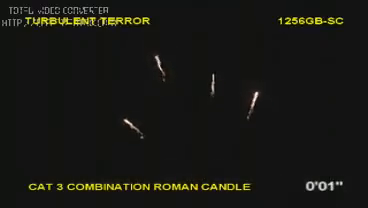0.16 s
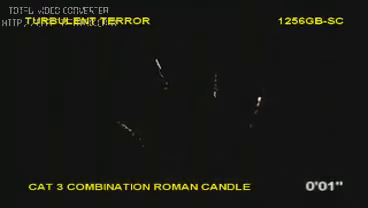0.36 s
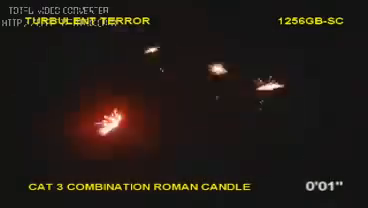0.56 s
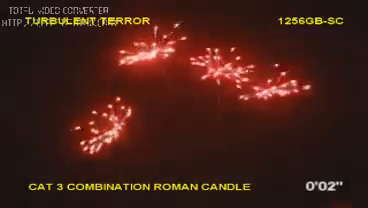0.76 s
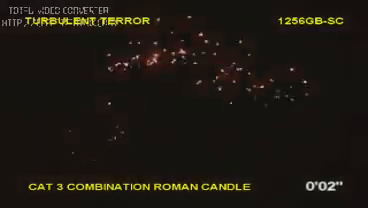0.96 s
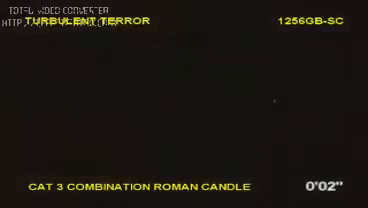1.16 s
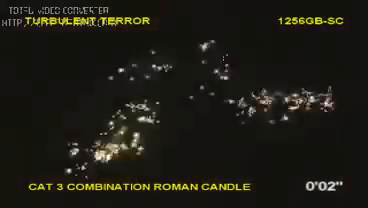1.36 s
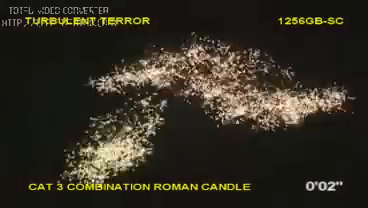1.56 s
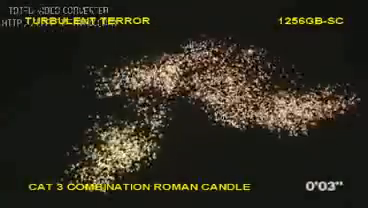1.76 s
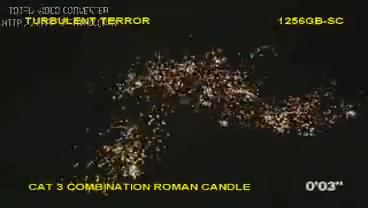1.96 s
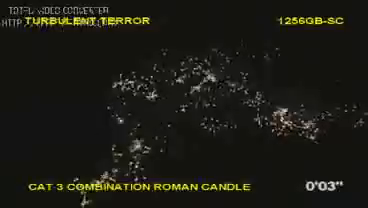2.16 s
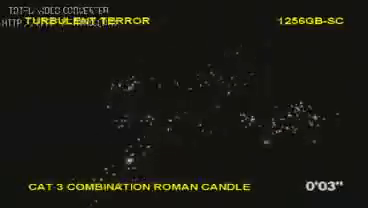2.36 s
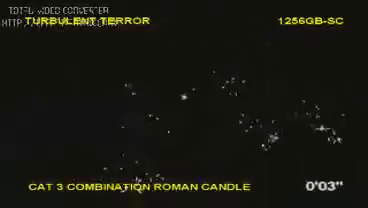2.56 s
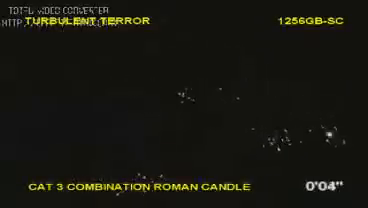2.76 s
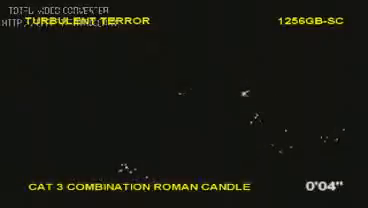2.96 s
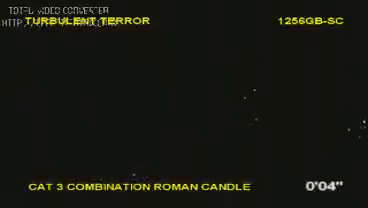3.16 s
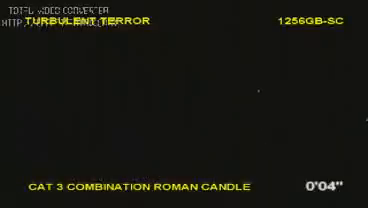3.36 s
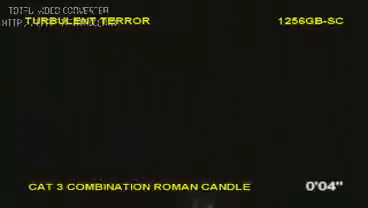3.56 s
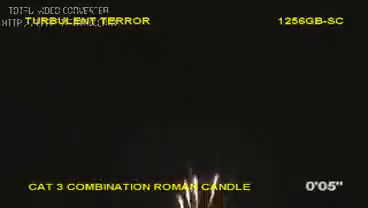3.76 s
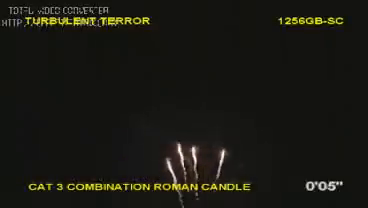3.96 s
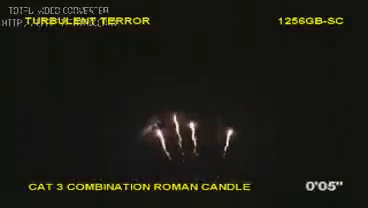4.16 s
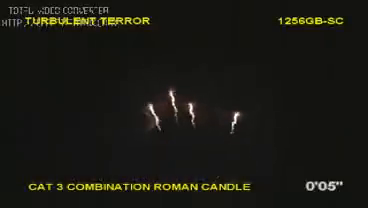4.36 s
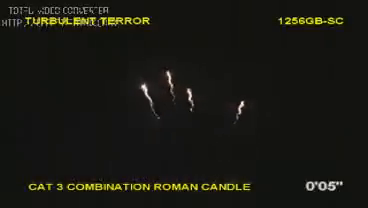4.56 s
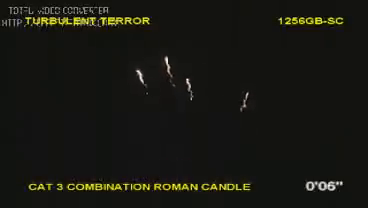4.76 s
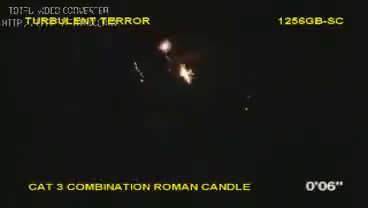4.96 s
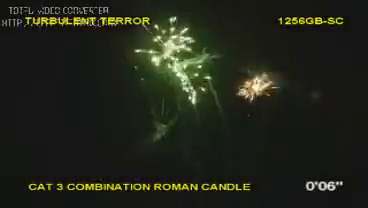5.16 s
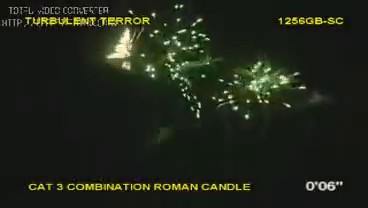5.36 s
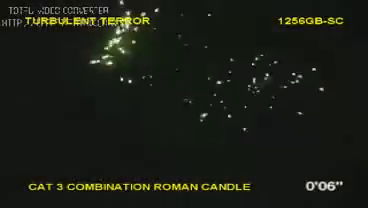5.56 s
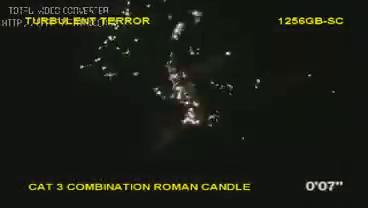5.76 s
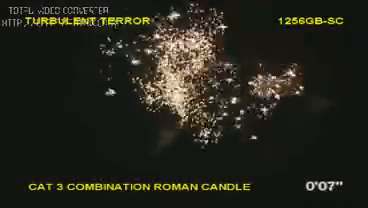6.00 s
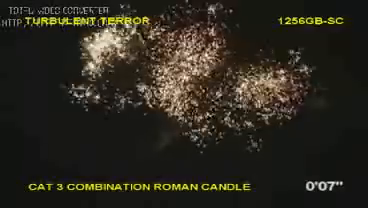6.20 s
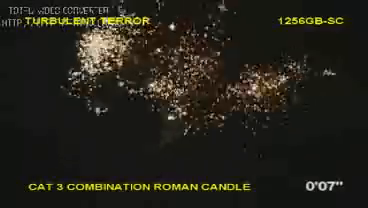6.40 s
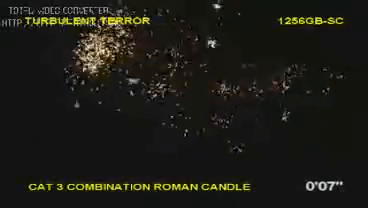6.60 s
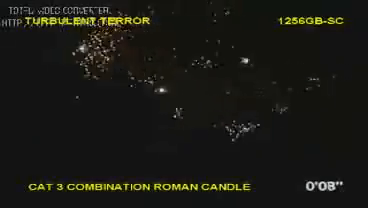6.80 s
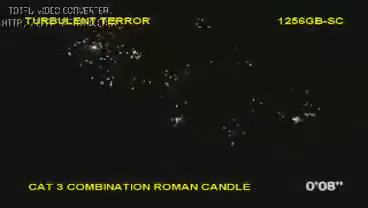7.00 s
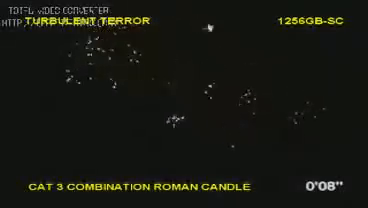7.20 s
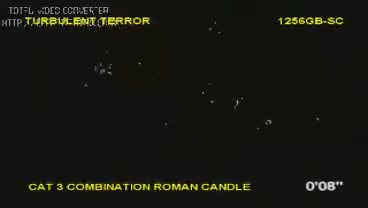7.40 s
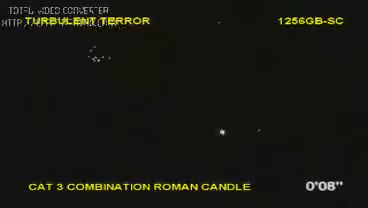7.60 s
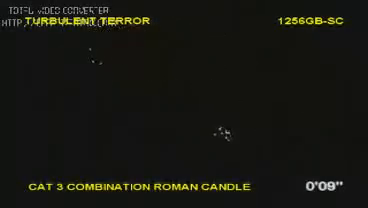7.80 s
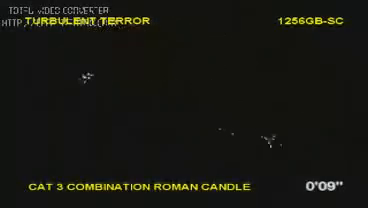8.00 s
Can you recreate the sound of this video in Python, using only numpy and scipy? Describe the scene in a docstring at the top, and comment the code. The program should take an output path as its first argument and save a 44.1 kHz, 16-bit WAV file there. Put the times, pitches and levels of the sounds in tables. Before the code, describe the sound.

A firework cake bursts in rapid echoing bangs, crackles away, then thumps out another volley that bursts and crackles in turn.

```python
"""Outdoors among houses, at night: a firework cake fires volleys of four lift charges.
The charges thump, the shells climb with sputtering tails and burst, and their stars crackle away.
Each cloud of stars swells, thins and dies out, leaving a few big ones that pop singly.
Two microphones, 30 m apart: left near and in the open, right far, among walls and set louder.
Reports reach the right about 90 ms later, overload it if strong, and roll round the neighbourhood."""
import sys
import numpy as np
from scipy import signal
from scipy.fft import rfft, irfft, next_fast_len
from scipy.io import wavfile

SR = 44100
rng = np.random.default_rng(int(sys.argv[2]) if len(sys.argv) > 2 else 0)


def bounce(signal):
    """Save signal as a 16-bit WAV file at the path given by the first command-line argument."""
    frames = np.transpose(np.atleast_2d(signal))
    limited = np.clip(frames, -1, 1)
    pcm = np.round(limited * 32767).astype(np.int16)
    wavfile.write(sys.argv[1], SR, pcm)


N = 354563
LEAD = SR  # samples before time zero
TOP_HZ = 7800
LIFT_LAG_S = .098  # near to far microphone

# lift charges: (near time [s], thump [dB], gas blast [dB])
LIFTS = [(-.9, -3, -3), (-.85, -3, -2), (-.79, -2.5, -1), (-.73, -2.5, 0), (3.6742, -.5, -2),
         (3.7220, 0, -3), (3.7762, 1, .5), (3.8332, 1, 2.5)]
# shell bursts: (near time [s], near level [dB], far time [s], far level [dB],
# wall delay [s], house delay [s], house echo [dB])
BURSTS = [(.7776, 2, .8669, 11, .004, .158, -15), (.8269, 2, .9141, 10, .003, .198, -19),
          (.8610, 0, .9467, 8, .0036, .238, -14.5), (.8772, 0, .9595, 8, .0038, .235, -16),
          (5.2447, 3.5, 5.3298, 12, .0035, .11, -15), (5.2560, 3.5, 5.3362, 11, .0043, .143, -16),
          (5.4190, 2, 5.5054, 11, .0032, .224, -13), (5.5336, -2, 5.6129, 13, .0039, .149, -8)]
# star clouds: (ignition at far microphone [s], peak activity [dB], burn [s])
CLOUDS = [(1.585, 1.5, .73), (6.07, 3, .65)]
# late single stars: (ignition at far microphone [s], relative level [dB])
LATE_STARS = [(2.64, -19), (2.689, -19), (2.722, -18), (2.779, -19), (2.816, -21), (2.857, -17),
              (2.884, -23), (2.949, -22), (2.973, -18), (2.988, -25), (3.024, -20), (3.187, -18),
              (3.196, -20), (3.278, -22), (3.408, -22), (6.969, -16), (7.078, -20), (7.129, -18),
              (7.148, -18), (7.178, -18), (7.203, -18), (7.21, -18), (7.216, -19), (7.244, -19),
              (7.284, -20), (7.313, -22), (7.396, -20), (7.445, -17), (7.495, -20), (7.544, -20),
              (7.669, -20), (7.701, -21), (7.892, -17)]

# background spectrum: (frequency [Hz], level [dB])
RUMBLE_TONE = [(25, -21), (70, 2), (100, 1.5), (140, -10), (185, 0), (230, -2), (300, -16), (450, -22),
               (1600, -25), (3900, -44), (7500, -44)]
# burning tail spectrum: (frequency [Hz], level [dB])
FIZZ_TONE = [(100, -20), (500, -6), (1000, -2), (1700, 1), (3100, -4), (4300, -15), (6000, -11.5),
             (7500, -15)]
# gas blast spectrum: (frequency [Hz], level [dB])
GAS_TONE = [(200, -14), (600, -9), (1000, -9), (1700, 0), (2500, -4), (3500, 0), (4400, -8), (5200, -3),
            (7500, -4)]
# lift thump spectrum: (frequency [Hz], level [dB])
LIFT_TONE = [(30, -28), (110, -11), (170, 0), (240, 2), (450, -5.5), (800, -15), (1600, -13), (3200, -17),
             (4500, -22), (7500, -20)]
# star pop spectrum: (frequency [Hz], level [dB])
STAR_TONE = [(40, -20), (130, -11), (220, 0), (380, -3.5), (520, -1.5), (1050, .4), (2000, -2.5),
             (3400, -3), (4300, -7.5), (7500, -3.7)]
# shell burst spectrum: (frequency [Hz], level [dB])
BURST_TONE = [(30, -30), (100, -6), (140, -8), (200, 1.5), (500, 1.5), (850, -1.5), (1400, -9.5),
              (3000, -15.5), (4000, -18), (5200, -15), (7500, -16.5)]

# house fronts echoing the thump: (delay [s], level [dB], low-pass edge [Hz])
THUMP_FRONTS = [(.004, -16, 1000), (.0145, -3, 250), (.0322, -5, 800), (.1085, -8, 5000), (.164, -13, 3000),
                (.276, -14, 1200), (.334, -17, 900)]
# house fronts echoing the gas blast: (delay [s], level [dB])
SPIT_FRONTS = [(.1085, -4), (.164, -14)]
# scattered echoes, near microphone: (close level [dB re houses], close span [s], lull [dB re houses],
# houses' onset [s], build-up [s], tone (frequency [Hz], level [dB]))
NEAR_ROLL = dict(close_db=9, close_s=.04, lull_db=-8, houses_s=.15, build_s=.17, tone=[(200, 0), (450, -3),
             (1000, -7), (3000, -6), (7500, -9)])
# scattered echoes, far microphone: same fields
FAR_ROLL = dict(close_db=2.5, close_s=.045, lull_db=-8.5, houses_s=.09, build_s=.02, tone=[(200, 0),
            (450, -2.8), (1000, -2.5), (3000, -4), (7500, -8)])
# echo decay in air: (frequency [Hz], t60 [s])
AIR_T60 = [(100, 2.5), (300, 2.3), (1000, 2.1), (3000, 1.9), (7500, 1.7)]


def amp(db):
    """Decibels to gain."""
    return 10 ** (np.asarray(db) / 20)


def along(points, hz):
    """(Hz, value) points read on a log axis."""
    knots_hz, values = np.transpose(points)
    return np.interp(np.log(hz + 1), np.log(knots_hz), values)


def filtered(x, response):
    """x times a frequency response."""
    size = next_fast_len(x.shape[-1] + 8192)
    return irfft(rfft(x, size) * response(np.fft.rfftfreq(size, 1 / SR)), size)[..., :x.shape[-1]]


def coloured(x, tone):
    """x shaped by a spectrum table."""
    return filtered(x, lambda hz: amp(along(tone, hz)))


def highpass(x, edge_hz):
    """First-order bass roll-off."""
    return signal.lfilter(*signal.butter(1, edge_hz, "high", fs=SR), x)


def through(x, kernel):
    """x convolved with an impulse response."""
    return signal.fftconvolve(x, kernel)[:len(x)]


def add(track, at_s, sound):
    """Mix a sound into a track."""
    part = track[max(LEAD + round(at_s * SR), 0):][:len(sound)]
    part += sound[:len(part)]


def clicks(times_s, levels_db):
    """A track of impulses."""
    return np.bincount(LEAD + np.round(times_s * SR).astype(int), amp(levels_db), LEAD + N)[:LEAD + N]


def shock(tone, size=4096):
    """Minimum-phase pressure pulse, peak 1: steep front, then suction."""
    hz = np.fft.rfftfreq(size, 1 / SR)
    cepstrum = irfft(np.log(amp(along(tone, hz)) / (1 + (hz / TOP_HZ) ** 10)))
    cepstrum[1:size // 2] *= 2
    cepstrum[size // 2 + 1:] = 0
    pulse = irfft(np.exp(rfft(cepstrum)))
    return pulse / pulse.max()


def splash(t60_s):
    """Decaying noise, energy 1: scatter off a rough wall, or a puff of gas."""
    t = np.arange(SR // 10) / SR
    noise = rng.standard_normal(len(t)) * amp(-60 * t / t60_s)
    return noise / np.linalg.norm(noise)


def roll(shape, lump_db, lump_s=.009, size=256, frames=520):
    """Scattered echoes, energy 1: close objects, a lull, then houses and trees, duller with distance."""
    t = np.arange(frames) * size / 2 / SR
    hz = np.fft.rfftfreq(size, 1 / SR)[:, None]
    close = np.clip(1 - t / shape["close_s"], 0, 1)
    houses = np.clip((t - shape["houses_s"]) / shape["build_s"], 0, 1)
    uneven_db = lump_db * houses * np.interp(t / lump_s, np.arange(frames), rng.standard_normal(frames))
    envelope_db = close * shape["close_db"] + (1 - close - houses) * shape["lull_db"] + uneven_db
    magnitude = amp(envelope_db + along(shape["tone"], hz) - 60 * t / along(AIR_T60, hz))
    phasors = np.exp(2j * np.pi * rng.random((len(hz), frames)))
    tail = signal.istft(magnitude * phasors, SR, nperseg=size)[1]
    return tail / np.linalg.norm(tail)


def background(wind_start_s=6.2, wind_rise_s=1.7, wind_db=-51.5, wind_hz=110):
    """Steady low rumble, unrelated left and right; late, light wind on the near microphone."""
    rumble = coloured(rng.standard_normal((2, LEAD + N)), RUMBLE_TONE)
    near, far = rumble / rumble.std() * amp([[-60.5], [-48.3]])
    buffet = signal.lfilter(*signal.butter(2, wind_hz, fs=SR), rng.standard_normal(LEAD + N))
    ramp = np.clip((np.arange(-LEAD, N) / SR - wind_start_s) / wind_rise_s, 0, 1)
    return np.array([near + amp(wind_db) * ramp * buffet / buffet.std(), far])


def comets(rise_s=.05, fade_db_per_s=28.5, sputter_db=4.5,
           rush_db=-20, rush_fade_db_per_s=6, rush_hz=1100):
    """Each shell's tail sputters and fades as it climbs; a dull rush of air lasts longer."""
    burn_power, rush_power = np.zeros((2, LEAD + N))
    t = np.arange(SR + SR // 2) / SR
    onset = 1 - np.exp(-t / rise_s)
    for at_s, db, _ in LIFTS:
        add(burn_power, at_s, (amp(db - fade_db_per_s * t) * onset) ** 2)
        add(rush_power, at_s, (amp(2 * db - rush_fade_db_per_s * t) * onset) ** 2)
    sputter = np.repeat(rng.standard_normal((LEAD + N) // 128 + 1), 128)[:LEAD + N]
    fizz = coloured(rng.standard_normal(LEAD + N) * amp(sputter_db * sputter), FIZZ_TONE)
    rush = filtered(rng.standard_normal(LEAD + N), lambda hz: hz / (1 + (hz / rush_hz) ** 3))
    climb = fizz / fizz.std() * np.sqrt(burn_power)
    climb += amp(rush_db) * rush / rush.std() * np.sqrt(rush_power)
    return np.array([amp(-57) * climb, amp(-38.5) * np.roll(climb, round(LIFT_LAG_S * SR))])


def spits(t60_s=.035, gain_db=-17, centre_hz=2650, half_width_hz=550):
    """Each gas blast returns from the house fronts as a puff of narrow, bright noise."""
    far = np.zeros(LEAD + N)
    t = np.arange(SR // 10) / SR
    for at_s, _, blast_db in LIFTS:
        for delay_s, front_db in SPIT_FRONTS:
            noise = rng.standard_normal(len(t))
            band = filtered(noise, lambda hz: 1 / (1 + ((hz - centre_hz) / half_width_hz) ** 2))
            envelope = amp(gain_db + blast_db + front_db - 60 * t / t60_s)
            add(far, at_s + LIFT_LAG_S + delay_s, envelope * band / band.std())
    return np.array([amp(-14) * np.roll(far, -round(LIFT_LAG_S * SR)), far])


def lifts(near_db=-9.5, far_db=1.5, near_roll_db=-8.5, far_roll_db=-10.7,
          near_gas_db=-4.5, far_gas_db=3):
    """Tubes thump and vent hot gas from one spot on the ground, so all share one lag and echo pattern."""
    near, far = np.zeros((2, LEAD + N))
    thump = np.pad(shock(LIFT_TONE), (0, SR + SR // 2))
    fronts = filtered(thump, lambda hz: sum(
        amp(db) * np.exp(-2j * np.pi * hz * delay_s) / (1 + 1j * hz / edge_hz)
        for delay_s, db, edge_hz in THUMP_FRONTS))
    in_open = thump + amp(near_roll_db) * through(thump, roll(NEAR_ROLL, lump_db=4))
    among_walls = thump + fronts + amp(far_roll_db) * through(thump, roll(FAR_ROLL, lump_db=4))
    for at_s, thump_db, blast_db in LIFTS:
        far_s = at_s + LIFT_LAG_S
        add(near, at_s, amp(thump_db + near_db) * in_open)
        add(far, far_s, amp(thump_db + far_db) * among_walls)
        add(near, at_s, amp(blast_db + near_gas_db) * highpass(splash(t60_s=.05), edge_hz=5500))
        add(far, far_s, amp(blast_db + far_gas_db) * coloured(splash(t60_s=.11), GAS_TONE))
    return np.array([near, far])


def late_stars(fuse_s=.0014, gain_db=7.2):
    """The last big stars pop once, just after ignition: (time [s], level [dB])."""
    return np.array(LATE_STARS) + [fuse_s, gain_db]


def cloud(start_s, peak_db, burn_s, swell_s=.22, swell_db=16, sag_db_per_s=8, die_s=.4, die_db_per_s=75,
          base_pops_per_s=720, pop_db=-17, spread_db=2.7, clump_db=3.8):
    """Stars pop in bunches as their cloud swells, thins and dies: (time [s], level [dB])."""
    age_s = np.arange(0, swell_s + burn_s + die_s, 1 / SR)
    burnt_s = age_s - swell_s
    activity_db = (peak_db - swell_db * (np.minimum(burnt_s, 0) / swell_s) ** 2
                   - sag_db_per_s * np.clip(burnt_s, 0, burn_s)
                   - die_db_per_s * np.maximum(burnt_s - burn_s, 0))
    clumps = np.interp(age_s, np.linspace(0, age_s[-1], 120), rng.standard_normal(120))
    popped = np.cumsum(base_pops_per_s * amp(1.2 * activity_db + clump_db * clumps)) / SR
    jitter, strength = rng.standard_normal((4096, 2))[:int(popped[-1])].T
    times_s = np.interp(np.arange(len(jitter)) + jitter, popped, age_s)
    levels_db = pop_db + .5 * np.interp(times_s, age_s, activity_db) + spread_db * strength
    return np.column_stack([start_s + times_s, levels_db])


def crackle(sky_parts=6):
    """Every star pops once; lag and wall echoes depend on where it hangs."""
    at_s, db = np.vstack([late_stars()] + [cloud(*row) for row in CLOUDS]).T
    place = rng.uniform(-1, 1, (8192, 2))[:len(at_s)]
    lag_s = .087 + .005 * place[:, 0]
    wall_s = .0026 + .0012 * place[:, 1]
    far = clicks(at_s, db) + clicks(at_s + wall_s, db - 1)
    for k in range(sky_parts):  # each part has its own scatter off nearby walls
        far += amp(-3.5) * through(clicks(at_s[k::sky_parts], db[k::sky_parts]), splash(t60_s=.085))
    far += amp(-12) * through(far, roll(FAR_ROLL, lump_db=2))
    near = clicks(at_s - lag_s, db)
    near += amp(-11.5) * through(near, roll(NEAR_ROLL, lump_db=2))
    near = highpass(near, edge_hz=900)  # thinner in the open
    pop = shock(STAR_TONE)
    return np.array([amp(-4) * through(near, pop), amp(2.5) * through(far, pop)])


def bursts(ground_s=.0007, brick_db=-6.5, brick_hz=1500, near_roll_db=-12, far_roll_db=-10.5):
    """Each shell cracks at its own place in the sky and wakes its own echoes among the walls."""
    near, far = np.zeros((2, LEAD + N))
    crack = shock(BURST_TONE)
    open_tail = amp(near_roll_db) * signal.fftconvolve(crack, roll(NEAR_ROLL, lump_db=4))
    for near_s, near_db, far_s, far_db, wall_s, house_s, house_db in BURSTS:
        add(near, near_s, amp(near_db) * crack)
        add(near, near_s + ground_s, amp(near_db - 3) * crack)
        add(near, near_s, amp(near_db) * open_tail)
        bang = amp(far_db) * crack
        # direct, closest wall twice, second wall
        for delay_s, db in (0, 0), (wall_s, -1), (2 * wall_s, -13), (.015, -9):
            add(far, far_s + delay_s, amp(db) * bang)
        brick_scatter = highpass(signal.fftconvolve(bang, splash(t60_s=.06)), brick_hz)
        add(far, far_s, amp(brick_db) * brick_scatter)
        add(far, far_s + house_s, amp(house_db) * signal.fftconvolve(bang, splash(t60_s=.05)))
        add(far, far_s, amp(far_roll_db) * signal.fftconvolve(bang, roll(FAR_ROLL, lump_db=4.5)))
    return np.array([near, far])


def scene():
    """Near microphone left, far microphone right."""
    return (lifts() + comets() + spits() + bursts() + crackle() + background())[:, LEAD:]


def hum_filter(hz, hum_hz=300, feedback=.75, depth=.62):
    """Comb of narrow notches at multiples of hum_hz."""
    delay = np.exp(-2j * np.pi * hz / hum_hz)
    return 1 - depth * (1 - feedback) / 2 * (1 + delay) / (1 - feedback * delay)


def record(dry, ceiling=.66, hardness=2.5):
    """Strong reports saturate; hum notches and a steep band limit follow."""
    saturated = dry / (1 + np.abs(dry / ceiling) ** hardness) ** (1 / hardness)
    return filtered(saturated, lambda hz: hum_filter(hz) / (1 + (hz / TOP_HZ) ** 120))


dry = scene()
out = record(dry)
bounce(out)
```